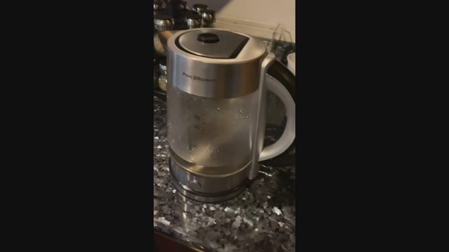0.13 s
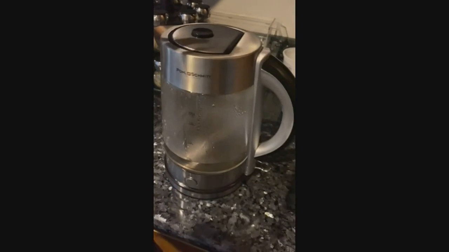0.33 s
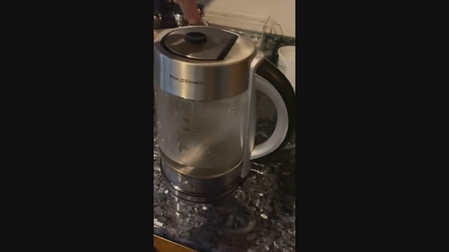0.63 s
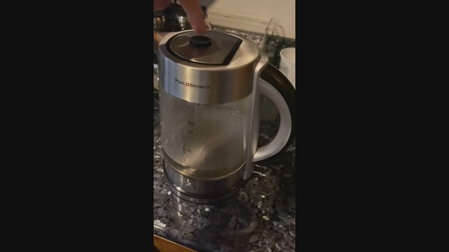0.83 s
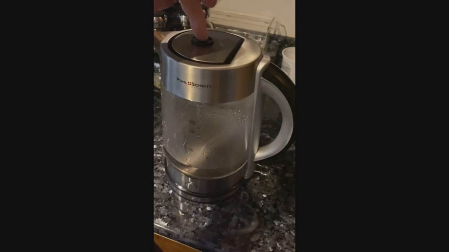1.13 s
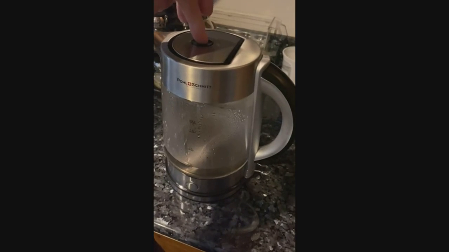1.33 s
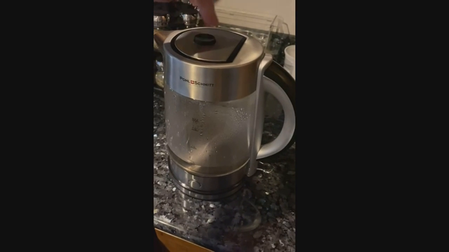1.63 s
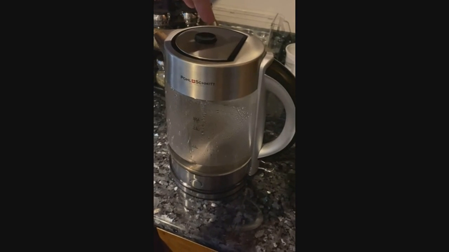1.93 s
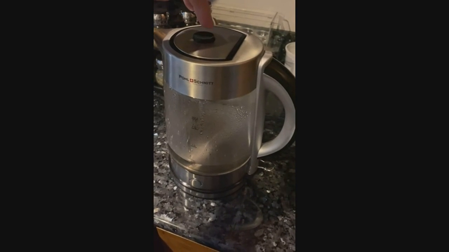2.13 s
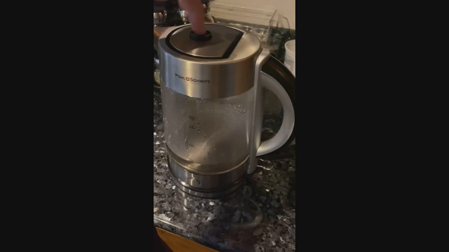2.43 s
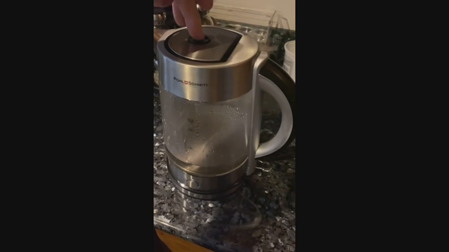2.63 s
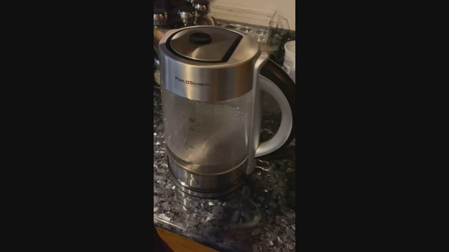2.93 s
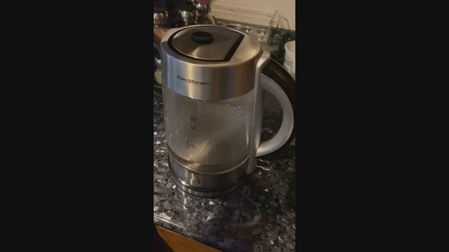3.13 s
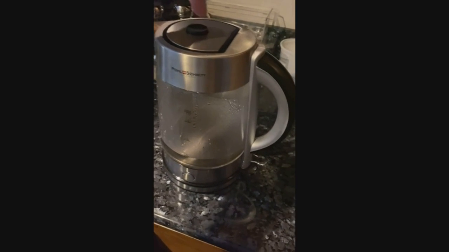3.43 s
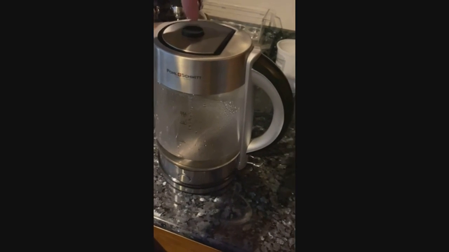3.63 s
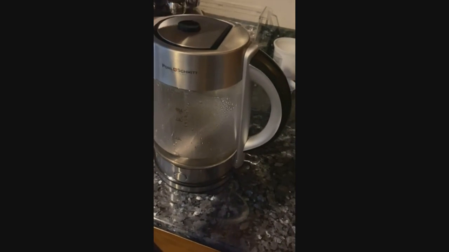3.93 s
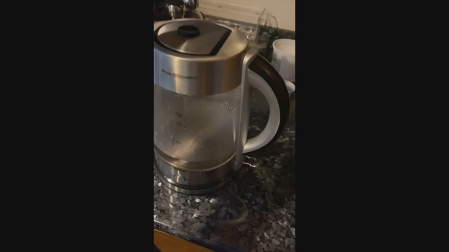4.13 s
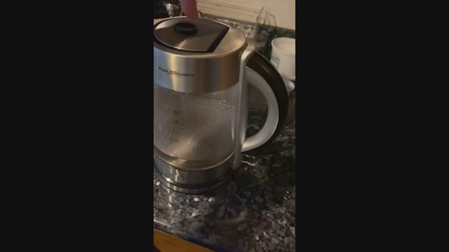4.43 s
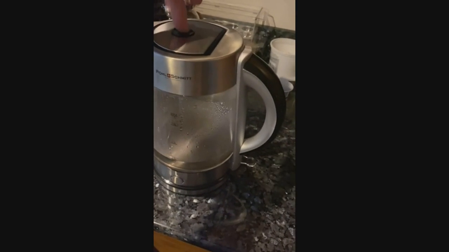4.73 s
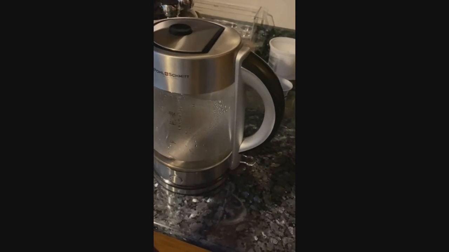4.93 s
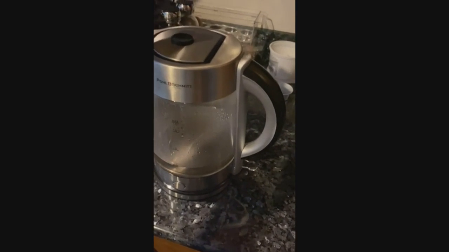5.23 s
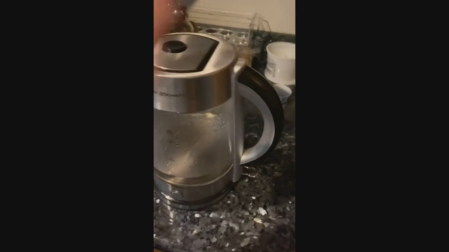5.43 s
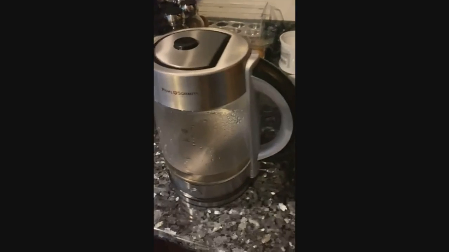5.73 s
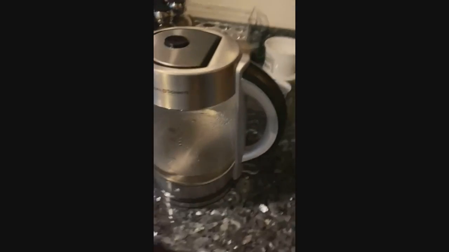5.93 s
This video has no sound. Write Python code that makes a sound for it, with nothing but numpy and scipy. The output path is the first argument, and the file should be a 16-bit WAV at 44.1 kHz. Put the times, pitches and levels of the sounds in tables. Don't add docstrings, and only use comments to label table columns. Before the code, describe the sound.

Close handheld stereo pickup in a kitchen: a steady low hum and bubbling simmer that swells slightly, with faint skin rubs on the casing. Small lid taps lead to four crisp, clacking latch snaps, spaced about a second apart, with a light reverberant tail. Breathy steam puffs slip between them, then the grip shifts with scraping, ticks and bassy bumps.

```python
import sys
import numpy as np
from scipy import signal
from scipy.fft import rfft, irfft, next_fast_len
from scipy.io import wavfile
from scipy.ndimage import uniform_filter1d

SR = 44100
rng = np.random.default_rng(int(sys.argv[2]) if len(sys.argv) > 2 else 0)


def materialize(psi):
    bounded = np.clip(np.atleast_2d(psi).T, -1, 1)
    quanta = np.round(bounded * 32767).astype(np.int16)
    wavfile.write(sys.argv[1], SR, quanta)


def invert_db(level):
    return 10 ** (np.asarray(level, dtype=float) / 20)


N = 267642

# (frequency [Hz], left-right likeness [-1..1])
ROOM_LIKENESS = [(60, 1), (130, 0.98), (290, 0.97), (640, 0.085), (1410, -0.12), (3100, -0.43),
                 (6820, 0.28), (11000, -0.56), (13000, -.85)]


def evened(x):
    return x / np.sqrt(np.mean(x ** 2) + 1e-20)


def read(points, hz):
    f, value = np.transpose(points)
    return np.interp(np.log(hz + 1), np.log(f + 1), value)


def add(mix, s, sound):
    part = mix[round(s * SR):][:len(sound)]
    part += sound[:len(part)]


def filtered(x, gain):
    size = next_fast_len(N)
    return irfft(rfft(x, size) * gain(np.fft.rfftfreq(size, 1 / SR)), size)[..., :N]


def second_port(left, other, likeness, hz):
    same = np.clip(read(likeness, hz), -1, 1)[:, None]
    return np.array([left, same * left + np.sqrt(1 - same ** 2) * other])


def noise(shape, likeness, patchy_db, size=1024):
    frames, hz = 2 * N // size + 5, np.fft.rfftfreq(size, 1 / SR)
    a, b, c, d, patches = rng.standard_normal((frames, len(hz), 5)).T
    patches = uniform_filter1d(patches, size=4, axis=0)
    patches = evened(uniform_filter1d(patches, size=5, axis=1))
    z = second_port(a + 1j * b, c + 1j * d, likeness, hz)
    z = z * invert_db(read(shape, hz)[:, None] + patchy_db * patches)
    return evened(signal.istft(z, window="cosine", nperseg=size, noverlap=size // 2)[1][:, :N])


def kettle():
    # (time [s], strength [dB])
    heat = [(0.0, -58.5), (0.24, -58.5), (0.59, -56), (0.78, -54.5), (1.28, -53), (1.81, -53), (2.11, -57),
            (2.31, -53.5), (2.41, -53.5), (3.05, -54), (3.66, -55.5), (3.95, -53), (4.29, -55),
            (4.72, -52.5), (5.42, -54.5), (5.96, -51), (6.06, -49.5)]
    # (frequency [Hz], density [dB per Hz])
    boom_colour = [(25, -45), (45, -24.5), (62, 4.5), (78, -8), (100, -8), (140, -7), (250, -50),
                   (500, -110)]
    # (frequency [Hz], density [dB per Hz])
    simmer_colour = [(60, -30.5), (95, -0.5), (170, -8.5), (212, 2), (245, -4), (310, -4.5), (345, -11),
                     (440, -11.5), (600, -18), (1350, -31), (1800, -43), (3000, -74), (5000, -120)]
    # (frequency [Hz], density [dB per Hz])
    hiss_colour = [(700, -28), (1300, -9.5), (2500, -11.5), (4300, -13), (5200, -17.5), (11000, -23),
                   (12500, -25), (15700, -38), (16300, -63)]
    t = np.arange(N) / SR
    boil_db = np.interp(t, *np.transpose(heat)) + 54
    boom = invert_db(-55.5 + 1.85 * boil_db) * noise(boom_colour, ROOM_LIKENESS, patchy_db=-0.3, size=2048)
    slow_noise = signal.lfilter(*signal.butter(2, 60 / SR), rng.standard_normal(N))
    simmer_db = -55 + 0.94 * boil_db + 0.64 * evened(slow_noise)
    simmer = invert_db(simmer_db) * noise(simmer_colour, ROOM_LIKENESS, patchy_db=2.5, size=2048)
    hiss = invert_db(-82.5) * noise(hiss_colour, ROOM_LIKENESS, patchy_db=3.5)
    wander = np.cumsum(0.04 * rng.standard_normal((2, N)), 1)
    whine = invert_db(-100) * np.sin(2 * np.pi * 10060 * t + wander)
    return boom + simmer + hiss + whine


def case_ticks():
    # (time [s], level [dB])
    ticks = [
        (0.001, -59),
        (5.6206, -34.5),
        (5.824, -32),
        (5.9117, -38),
        (5.918, -28.5),
        (6.03, -33),
    ]
    t, t60_s, rise_s = np.arange(12000) / SR, 0.035, 0.00045
    strength = np.zeros(N)
    for s, db in ticks:
        add(strength, s, invert_db(db - 22.0 - 60 * t / t60_s) * (1 - np.exp(-t / rise_s)))
    return strength


def skin_strokes():
    # (start [s], length [s], rub [dB], scrape in the hollow [dB])
    strokes = [(0.043, 0.11, -87.5, -83), (0.108, 0.15, -85, -70.5), (0.205, 0.11, -86.5, -68),
               (2.217, 0.17, -93, -72), (2.495, 0.12, -92, -63), (5.444, 0.14, -86, -86),
               (5.602, .13, -77, -70), (5.656, 0.2, -75.5, -72), (5.741, 0.038, -77, -75),
               (5.766, 0.22, -73.5, -52.5), (5.904, 0.25, -72.5, -62)]
    rub, scrape = np.zeros((2, N))
    for s, length, rub_db, scrape_db in strokes:
        stroke = signal.windows.tukey(round(length * SR), 0.99)
        add(rub, s, stroke * invert_db(rub_db + 7.0))
        add(scrape, s, stroke * invert_db(scrape_db))
    stick_slip = evened(uniform_filter1d(rng.standard_normal(N), size=250))
    return rub * invert_db(1.37 * stick_slip), scrape


def case_knocks():
    # (time [s], level [dB], pitch [Hz])
    knocks = [(0.534, -53.5, 593), (3.406, -44.5, 580), (5.625, -41, 620), (5.83, -40.5, 610),
              (5.85, -53, 535), (5.877, -45, 620), (5.916, -37, 583), (5.959, -40, 630), (5.985, -41, 550),
              (5.862, -46, 590), (6.005, -44, 600), (6.015, -57, 660), (6.033, -23, 587)]
    t, t60_s, rise_s = np.arange(12000) / SR, 0.023, 0.0017
    out = np.zeros(N)
    for s, db, hz in knocks:
        envelope = invert_db(db + 8 - 60 * t / t60_s) * (1 - np.exp(-t / rise_s))
        add(out, s, envelope * np.sin(2 * np.pi * hz * t))
    return out


def air_shoves():
    # (time [s], level [dB], first pitch [Hz], last pitch [Hz])
    shoves = [
        (5.633, -24, 90, 51.6),
        (5.829, -30, 316, 129),
        (5.919, -18.5, 266, 55),
        (6.042, -34, 124, 80),
    ]
    t, glide_s, rise_s = np.arange(12000) / SR, 0.0056, 0.0083
    out = np.zeros(N)
    for s, db, first_hz, last_hz in shoves:
        turns = np.cumsum(last_hz + (first_hz - last_hz) * np.exp(-t / glide_s)) / SR
        fade_db = -60 * t * last_hz / 5.43
        swing = np.sin(2 * np.pi * turns)
        add(out, s, -invert_db(db + 7.5 + fade_db) * (1 - np.exp(-t / rise_s)) * swing)
    return out


def hand():
    # (frequency [Hz], density [dB per Hz])
    nail_colour = [(500, -16), (1800, -1), (4000, -4), (5500, -2), (9500, -3), (12000, -8), (15800, -6),
                   (16300, -60)]
    # (frequency [Hz], density [dB per Hz])
    rub_colour = [(500, -28), (1200, -7.5), (2000, -8), (3500, -7.5), (4800, -11.5), (5500, -6),
                  (6600, -13), (11500, -12), (13000, -10.5), (15700, -21), (16300, -63)]
    # (frequency [Hz], left-right likeness [-1..1])
    case_likeness = [(60, .99), (240, -0.093), (950, 0.72), (3770, 0.075), (11500, -0.39), (13000, -1)]
    # (frequency [Hz], density [dB per Hz])
    hollow = [(120, -58), (250, -45), (450, 2), (620, -3), (800, -1.0), (1300, -29), (2500, -84)]
    ticks = case_ticks() * noise(nail_colour, case_likeness, patchy_db=1, size=256)
    rub, scrape = skin_strokes()
    rub = rub * noise(rub_colour, case_likeness, patchy_db=1.7, size=256)
    scrape = scrape * noise(hollow, case_likeness, patchy_db=7.0, size=512)
    knock, shove = case_knocks(), air_shoves()
    late = np.roll(knock, 7) + np.roll(shove, 20)
    return np.array([late, knock + shove]) + rub + ticks + scrape


def steam():
    # (start [s], length [s], level
    # [dB], first centre [Hz], last centre [Hz])
    puffs = [(.1, 0.19, -90, 3700, 3550), (0.423, 0.14, -83.5, 4200, 4000), (2.98, .14, -84, 4130, 4130),
             (2.23, 0.092, -85, 3700, 3500), (2.24, .17, -82.5, 2550, 2610), (3.792, 0.14, -77, 2000, 1770),
             (2.488, 0.16, -81.5, 3500, 3560), (2.552, 0.19, -82, 4150, 3960),
             (3.08, 0.19, -78.5, 3700, 3440), (3.253, .22, -81.5, 4150, 4000), (3.6, 0.09, -89, 4450, 4400),
             (3.76, 0.25, -78, 4250, 3920), (4.012, 0.3, -82, 3900, 3520), (4.253, 0.18, -83.5, 4050, 3930),
             (4.574, 0.25, -74.5, 4330, 4080), (5.101, 0.25, -88, 4200, 3900),
             (5.299, 0.36, -84, 3900, 3850), (5.479, 0.21, -80.5, 3500, 3500)]
    low_noise = signal.lfilter(*signal.butter(2, 480 / SR), rng.standard_normal((2, 2, N)))
    fuzz = evened(low_noise)
    sputter = evened(uniform_filter1d(rng.standard_normal(N), size=1200))
    t, out = np.arange(N) / SR, np.zeros((2, N))
    for s, length, db, first_hz, last_hz in puffs:
        u = np.clip((t - s) / length, 0, 1)
        on = (u > 0) & (u < 1)
        centre_hz = 60 * sputter[::-1] + first_hz + (last_hz - first_hz) * u
        turn = 2 * np.pi * np.cumsum(centre_hz[on]) / SR
        swell = invert_db(db + 1.1 * sputter[on]) * np.sin(np.pi * u[on] ** 0.7) ** 0.6
        out[:, on] += swell * (fuzz[0][:, on] * np.cos(turn) + fuzz[1][:, on] * np.sin(turn))
    return out


def ring(modes, spread_db, rise_s):
    t, out = np.arange(20000) / SR, 0
    luck = rng.standard_normal((len(modes), 2))
    for (hz, db, t60), (strength, side) in zip(modes, luck):
        fade = invert_db(db + spread_db * strength - 60 * t / t60)
        out = out + np.sign(side) * fade * np.sin(2 * np.pi * hz * t)
    out = out * (1 - np.exp(-t / rise_s)) * np.cos(np.pi / 2 * t / t[-1])
    return out / abs(out).max()


def burst(db, rise_s, t60):
    t = np.arange(3000) / SR
    return invert_db(db - 60 * t / t60) * (1 - np.exp(-(t / rise_s) ** 2)) * rng.standard_normal(len(t))


def latch():
    # (time [s], snap [dB], hardness [dB], edge [dB], weight on the jug [dB])
    touches = [(1.097, -51.5, -63, 1, -50), (1.132, -60, -11.5, 8, -45), (1.204, -46, -18.5, -19, -59),
               (1.221, -53.5, -19, -7, -49.5), (1.246, -53.5, -39, 5, -56), (1.254, -56, -34, -9, -73),
               (1.332, -58, -28, 18, -66), (1.34, -54, -29, 21, -49.5), (2.519, -60, -15.5, 10.5, -50),
               (2.549, -57.5, -22.5, -10, -45), (4.652, -50.5, -50, 7, -48)]
    # (time [s], snap [dB], hardness [dB], edge [dB], weight on the jug [dB])
    presses = [(1.569, -56, 3, -2, -54), (1.576, -43.5, -4, 16, -43.5), (1.585, -56, -20, -6, -45),
               (1.596, -42.5, -10, 1, -46.5), (2.771, -45, -37, 3, -44), (2.779, -46.5, -6.5, 8.5, -46.5),
               (3.768, -36, -18, 1, -56), (3.778, -52, -17, -1, -40.5), (3.785, -44, -12.5, 3, -37.5),
               (4.574, -39, -8.5, -8, -47.5), (4.581, -40, -20.5, 21, -39.5), (4.588, -35, -12, -8, -39)]
    # (time [s], snap [dB], hardness [dB], edge [dB], weight on the jug [dB])
    snaps = [(1.618, -22, -13, 3, -41), (1.622, -26, -14, -17, -43), (1.632, -50, 1.5, 3, -57),
             (2.793, -22, -13.5, 1.5, -43.5), (2.797, -25, -15, 5, -46), (2.803, -26.5, -20, -20, -45),
             (3.918, -26, -12, 1.5, -40.5), (3.921, -32.5, -18, -7, -42), (3.931, -50, -9, 8, -56),
             (4.802, -28.5, -13, 0.5, -42.5), (4.813, -25.5, -19.5, -0.5, -57), (4.828, -61, 4, -20, -46)]
    # (frequency [Hz], level [dB], t60
    # [s])
    lid_modes = [(563, -7, 0.016), (683, -9.5, 0.026), (838, -9, 0.029), (990, -0.5, 0.014),
                 (1105, 2.5, 0.011), (1140, -3.5, 0.006), (1310, -10, 0.068), (1396, -36, 0.55),
                 (1840, -22, 0.013), (2034, -11, 0.033), (2470, 6, 0.0044), (2450, -12, 0.0038),
                 (2800, -24, 0.025), (3620, -32, 0.036)]
    # (frequency [Hz], level [dB], t60 [s])
    jug_modes = [(90, -12.5, 0.21), (208.3, -1.5, 0.048), (324, -7.5, 0.073), (472, -10, 0.039)]
    # (frequency [Hz], density [dB per Hz])
    rattle_colour = [(250, -33), (600, -13), (1000, 4.5), (1300, -1), (1520, -8.5), (2200, -12.5),
                     (4000, -43.5)]
    # (frequency [Hz], density [dB per Hz])
    crack_colour = [(800, -43), (1650, -6), (2050, -2), (3000, 1.5), (4000, -5.5), (5000, -5.5),
                    (8000, -35)]
    # (frequency [Hz], density [dB per Hz])
    sizzle_colour = [(3000, -18), (5400, -7), (6500, 0), (7600, -11.5), (10000, -11.5), (12000, -15.5),
                     (15200, -37), (15900, -66)]
    rings, rattles, cracks, sizzles = np.zeros((4, N))
    for rows, low_hz, high_hz in ((touches, 224, 245), (presses, 224, 245), (snaps, 202, 278)):
        for s, snap_db, hardness_db, edge_db, jug_db in rows:
            tilt_db = 0.3 * (hardness_db + 18)
            struck = [(hz, db + tilt_db * np.log2(hz / 1100), t60) for hz, db, t60 in lid_modes]
            rocking = (rng.uniform(low_hz, high_hz), 0.1, 0.09)
            add(rings, s, invert_db(snap_db - 4.5) * ring(struck, spread_db=-2.5, rise_s=0.002))
            add(rings, s, invert_db(jug_db + 5.0) * ring([*jug_modes, rocking], spread_db=7.0, rise_s=0.0049))
            crack_db = snap_db + hardness_db
            add(rattles, s, burst(snap_db + 6.0, rise_s=0.0012, t60=0.066))
            add(cracks, s, burst(crack_db + 12.5, rise_s=0.0022, t60=0.06))
            add(sizzles, s, burst(crack_db + edge_db + 13.5, rise_s=0.0038, t60=0.027))
    rattle = filtered(rattles, lambda hz: invert_db(read(rattle_colour, hz)))
    crack = filtered(cracks, lambda hz: invert_db(read(crack_colour, hz)))
    sizzle = filtered(sizzles, lambda hz: invert_db(read(sizzle_colour, hz)))
    return rings + rattle + crack + sizzle


def ports(x):
    # (frequency [Hz], lead of the left port [rad])
    lead = [(0, 0), (2070, .3), (2670, 2.3), (4310, .9), (5770, 7.8), (7580, 7.1), (9040, 7.8),
            (10900, 8.5), (12300, 8.85), (16000, 8.8)]
    level = invert_db([[-0.6], [0.6]])
    return filtered(x, lambda hz: level * np.exp(np.outer([0.5j, -0.5j], read(lead, hz))))


def kitchen(x):
    # (frequency [Hz], t60 [s])
    decay = [(200, 0.2), (1000, 0.79), (1370, 0.93), (1800, 0.69), (3200, 0.64), (8000, 0.38),
             (12000, 0.26), (15000, 0.042)]
    taps = np.zeros((2, SR))
    at = np.arange(300, SR - 20, 20) + rng.integers(0, 20, (2, (SR - 301) // 20))
    np.put_along_axis(taps, at, rng.choice([-1., 1.], at.shape), 1)
    hz, t, z = signal.stft(taps, SR, nperseg=256)
    z = second_port(z[0], z[1], ROOM_LIKENESS, hz)
    tail = signal.istft(z * invert_db(-60 * t / read(decay, hz)[:, None]), SR, nperseg=256)[1]
    return signal.fftconvolve(x[None], tail / np.linalg.norm(tail[0]), axes=1)[:, :N]


def scene():
    steady = kettle() + hand() + steam()
    lid = latch()
    echo_turn = 2 * np.pi * 27 * np.arange(N) / SR
    echoes = kitchen(lid * np.cos(echo_turn)) + kitchen(lid * np.sin(echo_turn))
    return steady + ports(lid) + invert_db(-17.5) * echoes


def top_cut(x):
    return signal.sosfilt(signal.butter(12, 16180, fs=SR, output="sos"), x)


def record(dry):
    heard = filtered(dry, lambda hz: hz ** 4 / (hz ** 4 + 28 ** 4))
    return top_cut(heard)


dry = scene()
out = record(dry)
materialize(out)
```